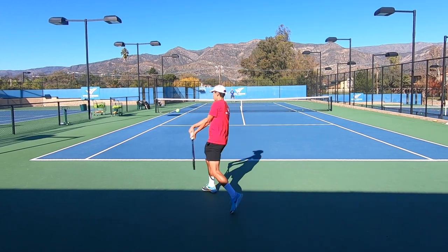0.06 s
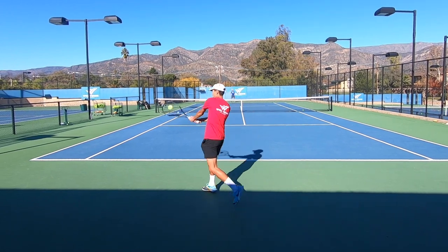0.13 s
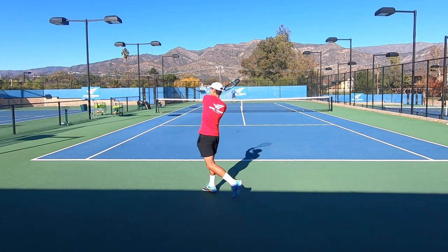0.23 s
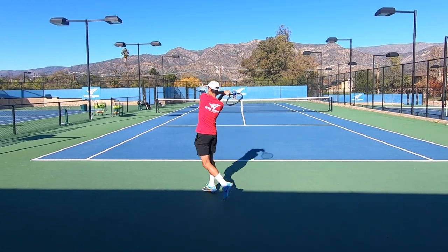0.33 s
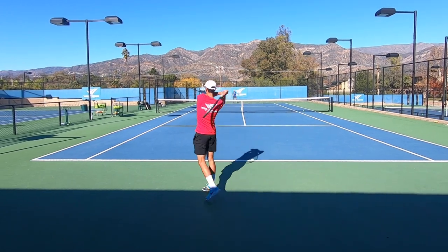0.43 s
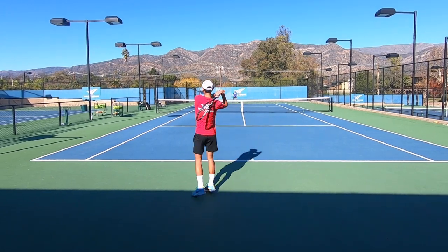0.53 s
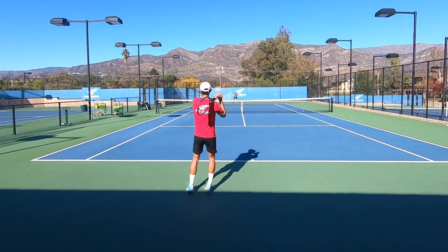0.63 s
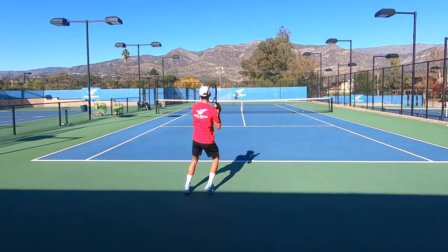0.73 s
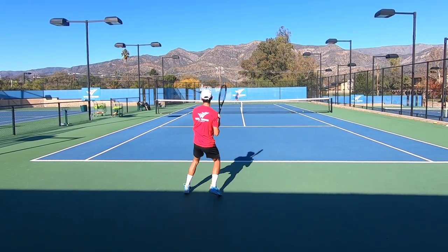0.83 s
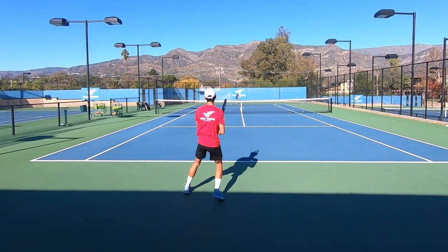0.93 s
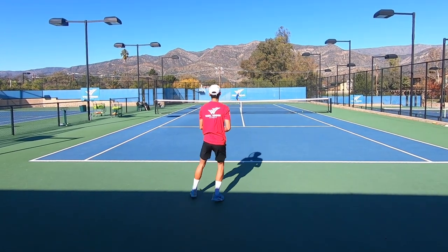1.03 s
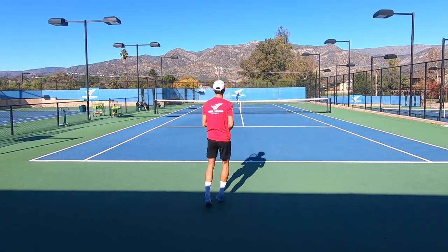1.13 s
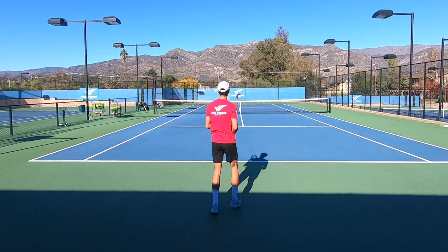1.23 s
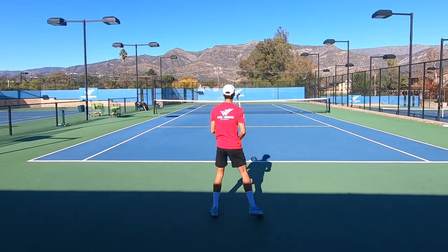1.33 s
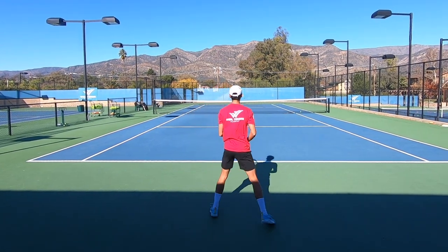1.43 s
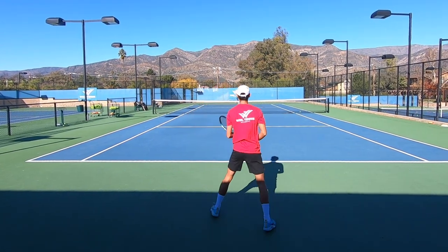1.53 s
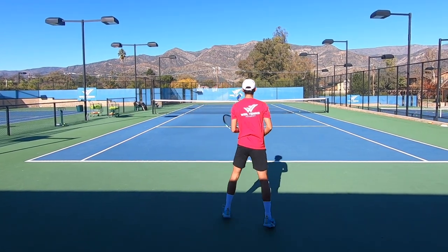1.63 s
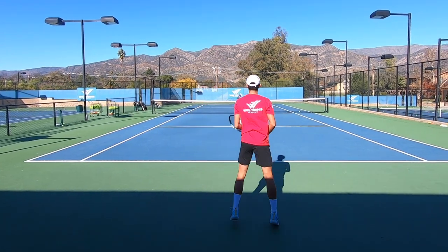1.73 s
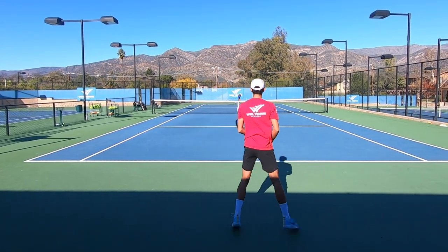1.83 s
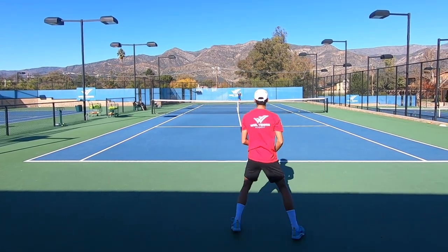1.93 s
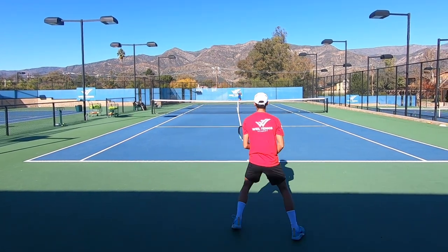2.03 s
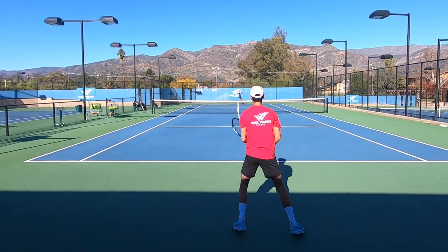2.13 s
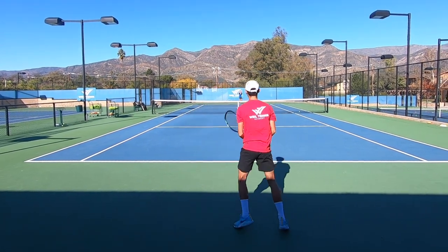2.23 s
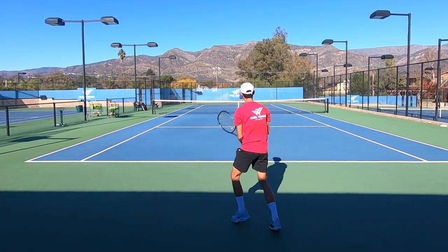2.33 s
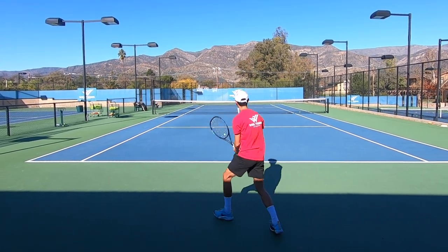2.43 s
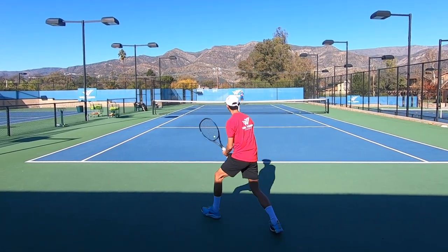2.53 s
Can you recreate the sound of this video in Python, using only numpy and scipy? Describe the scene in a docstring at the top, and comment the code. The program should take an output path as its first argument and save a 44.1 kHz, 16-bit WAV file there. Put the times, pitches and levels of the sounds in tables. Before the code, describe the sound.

Tennis shots on an open hard court, heard from behind the baseline on a phone: light bounce, swish, loud racket pop with echoes, shoe scuffs, then a duller far pop with wall echo and a heavy bounce.

```python
"""An outdoor hard court heard from a phone behind the baseline. A low two-partial hum wavers over noise-made
traffic throughout. A ball thuds, shoes scuff as filtered noise, a racket swishes and whistles, then the near
hit rings its modes with a noise crack; fence echoes and a noise tail follow, a second bounce among them.
Footfalls thud and a faint pop comes from another court; the far racket pops with its own echoes and tail,
and a last, heavier bounce lands between late scuffs and the end."""
import sys
import numpy as np
from scipy import signal
from scipy.fft import rfft, irfft
from scipy.io import wavfile
from scipy.ndimage import uniform_filter1d

SR = 44100
rng = np.random.default_rng(int(sys.argv[2]) if len(sys.argv) > 2 else 0)


def int16_out(signal):
    """Quantize to a 16-bit WAV file."""
    q = np.round(np.clip(np.atleast_2d(signal).T, -1, 1) * 32767)
    wavfile.write(sys.argv[1], SR, q.astype(np.int16))


def volts(x):
    """Linear amplitude factor 10**(x/20) for a level x in dB, scalar or array-like."""
    e = np.asarray(x, float) / 20
    return 10 ** e


N = 114660
T = np.arange(N) / SR
SIDES = np.array([[1], [-1]])  # side signal: plus on the left, minus on the right

# distant traffic spectrum (f/Hz, relative level/dB)
TRAFFIC = [(15, -11.5), (28, -6), (66, -20), (90, -16), (150, -21), (300, -28), (500, -37.5), (1000, -36),
           (2600, -47), (6000, -58.5), (12000, -71)]
# traffic side against mid (f/Hz, level/dB)
TRAFFIC_SIDE = [(20, -18), (60, -4), (250, -16), (600, -4.5), (1500, 0.5), (8000, -4)]
TRAFFIC_DB, TRAFFIC_FLICKER_DB = -47.5, 1
# machine hum swells and dips (t/s, level/dB)
HUM = [(0, -41), (.15, -46), (.4, -52.5), (.65, -47), (1.05, -50), (1.3, -55), (1.45, -44), (1.75, -43),
       (1.95, -48.5), (2.12, -60), (2.28, -42), (2.6, -46.5)]
HUM_HZ, HUM_WAVER, HUM_WAVER_DB, HUM_OCTAVE_DB = 59.86, 0.018, 2.5, -7.5  # HUM_WAVER: fraction of pitch

# modes of a ball or sole thudding on the court (f/Hz, level/dB, t60/s)
THUD_MODES = [(226, -2, 0.043), (361, -3.5, 0.03), (527, 1, 0.012), (806, 3.5, 0.014), (1093, -25.5, 0.084),
              (1470, -3, 0.013)]
# ball bounces (t/s, level/dB, left-right level/dB, crack level/dB)
BOUNCES = [(.0235, -32, -5, -52), (.3725, -27, 4.5, -42.5)]
# the last, heavier bounce (t/s, level/dB, left-right level/dB, crack level/dB)
NEAR_BOUNCE = [(2.5945, -15, -15.5, -66)]
# footfalls (t/s, level/dB, left-right level/dB, crack level/dB)
STEPS = [(.692, -45, -4, -60), (1.0855, -43, -3.5, -45), (1.486, -43, -7, -50)]
# noise crack of every blow (f/Hz, level/dB)
CRACK_COLOUR = [(400, 3.5), (1200, 7.5), (2500, 4), (4500, 1.5), (8000, 0.5), (12000, -3)]
CRACK_T60_S = 0.024  # for an unsmeared blow
PORT_HZ = 452  # below this both ports hear blows and scuffs much the same
DETUNE = 0.0375  # spread of mode pitch in smeared echoes, as a fraction

# shoe scuffs (start t/s, attack t/s, hold t/s, level/dB, left-right level/dB, centre f/Hz)
SCUFFS = [(0.102, 0.027, 0.029, -61.5, -4.5, 4500), (0.581, 0.066, 0.034, -63, -4, 5400),
          (0.6858, 0.0063, 0.045, -45.5, -3, 5030), (0.953, 0.00075, 0.012, -54.5, -5, 5440),
          (1.181, 0.0025, 0.043, -55.5, -4, 5540), (1.213, 0.04, 0.039, -51.5, -5, 6400),
          (1.481, 0.0043, 0.041, -56.5, -5, 6240), (1.169, 0.011, 0.082, -59.5, -6, 610),
          (1.78, 0.0017, 0.0017, -63.5, -4, 7000), (1.794, 0.004, 0.006, -70, -13.5, 7000),
          (2.153, 0.042, 0.11, -70.5, -8, 7000), (2.238, 0.0022, 0.019, -62, -2, 4650),
          (2.264, 0.0044, 0.0022, -56.5, -8, 5900), (2.342, 0.008, 0.009, -59, -8, 7000),
          (2.365, 0.0041, 0.009, -55.5, -5, 4770), (2.427, 0.00082, 0.0025, -69, -12, 7600),
          (2.439, 0.0018, 0.0012, -59.5, -7, 7000)]
SCUFF_OCTAVES, SCUFF_LOW_DB, SCUFF_LOW_HZ = 0.89, -8, 1150
SCUFF_RELEASE_S, SCUFF_TAIL_DB, SCUFF_TAIL_S = 0.0021, -11, 0.043
SCUFF_GRIT_DB, SCUFF_PATCHY_DB, SCUFF_SIDE_DB = 1.8, 3.8, -4.5

# racket swish (t/s, level/dB, string whistle f/Hz)
SWISH = [(.165, -67, 4700), (.185, -53.5, 5180), (.205, -48, 5300), (.222, -43, 5600), (.235, -36.5, 5600),
         (.26, -61, 5200), (.33, -52.5, 4800), (.36, -70, 4600)]
# air rush of the swish (f/Hz, level/dB)
SWISH_COLOUR = [(200, -12.5), (600, -2), (2000, -9), (5000, -11), (9000, -15), (14000, -9)]
WHISTLE_DB, WHISTLE_ENDS_S = -10, 0.226
WHISTLE_UPPER, WHISTLE_UPPER_DB = 1.6, -6  # upper partial: pitch ratio and level

# modes of ball and strings, close hit (f/Hz, level/dB, t60/s)
NEAR_MODES = [(95, -18, 0.079), (191, -8.5, 0.031), (287, -3.5, 0.042), (391, -6, 0.035), (543, -3, 0.023),
               (749, -1.5, 0.03), (974, -13.5, 0.043), (1006, -21.5, 0.077), (1079, 0.5, 0.025),
              (1302, -17.5, 0.043), (1488, -20, 0.073), (1660, -23, 0.043), (2027, -19, 0.036),
              (2475, -16.5, 0.019), (3210, -23.5, 0.03)]
# the close hit (t/s, level/dB, left-right level/dB, crack level/dB)
NEAR_HIT = [(.2258, -3, -2, -14.5)]
# its echoes off fences and walls (t/s, level/dB, left-right level/dB, crack level/dB)
NEAR_ECHOES = [(.413, -37, -13, -57), (.4235, -25.5, 7, -48), (.439, -33.5, 2, -49)]
CONTACT_S, ECHO_SMEAR_S = 0.0027, 0.002973
FENCE_HZ = 1000  # fences return little below this

# scattered echo tail of each hit (start t/s, level/dB, rise t/s, t60/s, broad part level/dB)
TAILS = [(0.23, -47, 0.0103, 1.14, 4), (1.86, -41.5, 0.0059, 1.68, -6.5)]
# the ball's ring in the tail (f/Hz, level/dB)
TAIL_COLOUR = [(550, -12), (850, 17), (1130, 23), (1400, -7), (1800, -21.5)]
# broader wash in the tail (f/Hz, level/dB)
TAIL_BROAD = [(300, 2), (700, 1), (1600, 0.5), (2500, -11), (4000, -9), (7000, -22)]
TAIL_FLUTTER_DB, TAIL_SIDE_DB = 1.5, -4
AIR_HZ, AIR_T60_S = 3500, 0.54  # added decay: the air eats the wash's treble sooner
LAST_WALL_S, BEYOND_T60_S = 0.33, 5.9  # added decay once the farthest wall has answered

# modes of ball and strings, far hit (f/Hz, level/dB, t60/s)
FAR_MODES = [(218, -9, 0.02), (380, -10, 0.011), (562, -13, 0.025), (812, -13, 0.066), (1110, 1, 0.021),
             (1241, -5.5, 0.016), (1737, -18, 0.015), (2250, -21, 0.0095), (3120, -18.5, 0.016)]
# a faint pop from another court (t/s, level/dB, left-right level/dB, crack level/dB)
OTHER_POP = [(1.165, -41.5, -6, -65)]
# the far hit (t/s, level/dB, left-right level/dB, crack level/dB)
FAR_HIT = [(1.8565, -35, 4, -47), (1.8585, -9, -2, -32), (1.8642, -16, -13.5, -56)]
# its echoes (t/s, level/dB, left-right level/dB, crack level/dB)
FAR_ECHOES = [(1.873, -23.5, -4, -36), (1.882, -24.5, -13.5, -40.5), (1.894, -24, 2, -45),
              (1.902, -24.5, -7, -37), (1.952, -64, -10, -34.5), (2.003, -38, -20, -65)]
# a flat wall returns both knocks cleanly (t/s, level/dB, left-right level/dB, crack level/dB)
WALL_ECHO = [(1.9572, -17, 11.5, -36.5), (1.961, -22.5, 1, -44)]

# treble colour of the phone's ports (f/Hz, level/dB)
MIC = [(2500, 1), (4700, -3), (6000, -3), (7500, -6), (10000, -9), (12000, -18.5), (15000, -19.5),
       (17000, -27)]


def colour(x, points):
    """Filter by (f/Hz, level/dB) points on a log frequency axis."""
    p, n = np.array(points, float), x.shape[-1]
    f = np.maximum(np.arange(n // 2 + 1) * SR / n, 1)
    gain_db = np.interp(np.log(f), np.log(p[:, 0]), p[:, 1])
    return irfft(rfft(x) * volts(gain_db), n)


def unit(x):
    """Scale to rms 1."""
    return x / np.sqrt(np.mean(x ** 2))


def walk(rate):
    """Slow random wander, spread 1, from about `rate` fresh values a second."""
    k = int(SR / rate)
    steps = np.repeat(rng.standard_normal(N // k + 1), k)
    w = uniform_filter1d(uniform_filter1d(steps, k), k)[:N]
    return unit(w - w.mean())


def wide(points, side_db):
    """Stereo noise of one colour: shared mid plus unrelated side."""
    mid, side = (unit(colour(rng.standard_normal(N), points)) for _ in range(2))
    return mid + volts(side_db) * side * SIDES


def place(x, pan_db):
    """Pan the part above the port frequency."""
    low = signal.lfilter(*signal.butter(1, PORT_HZ, fs=SR), x)
    return low + (x - low) * volts(pan_db / 2 * SIDES)


def traffic():
    """Smooth distant rumble, its stereo width changing with pitch."""
    mid, side = (colour(rng.standard_normal(N), TRAFFIC) for _ in range(2))
    both = mid + colour(side, TRAFFIC_SIDE) * SIDES
    return unit(both) * volts(TRAFFIC_DB + TRAFFIC_FLICKER_DB * walk(4.295))


def hum():
    """A wavering low tone and a partial near its octave."""
    s, db = np.array(HUM, float).T
    phase = 2 * np.pi * np.cumsum(HUM_HZ * (1 + HUM_WAVER * walk(7))) / SR
    first = volts(0.63 * HUM_WAVER_DB * walk(16.23)) * np.sin(phase)
    second_level = volts(HUM_OCTAVE_DB + HUM_WAVER_DB * walk(8.09))
    second = second_level * np.sin(1.98 * phase + 1.1 * walk(6.4))
    return np.sqrt(2) * volts(np.interp(T, s, db)) * (first + second)


def ring_modes(modes, u, top_hz, detune, rise_s):
    """Struck body: decaying sines of alternating sign, dulled above top_hz, softened by contact time."""
    ring = np.zeros(len(u))
    off = rng.standard_normal(len(modes))
    for k, (hz, db, t60) in enumerate(modes):
        tone = np.sin(2 * np.pi * hz * (1 + detune * off[k]) * u)
        dulling = 1 + (hz / top_hz) ** 2
        ring += (-1) ** k * volts(db) * tone * volts(-60 * u / t60) / dulling
    return ring * (1 - np.exp(-u / rise_s)) ** 2


def cluster(ring, smear_s):
    """A rough surface returns one arrival as four, at random small delays."""
    copies = ring.copy()
    for k, lag in enumerate(rng.random(3)):
        copies += 0.62 * np.roll(ring, int((k + lag) * smear_s * SR))
    return 0.96 * copies


def crack(u, top_hz, pan_db, smear_s, rise_s):
    """Short stereo noise burst of a contact, dulled by its path and lengthened by smear."""
    noise = unit(colour(rng.standard_normal((2, len(u))), CRACK_COLOUR))
    mid, side = signal.lfilter(*signal.butter(2, top_hz, fs=SR), noise)
    env = volts(-60 * u / (CRACK_T60_S + 3 * smear_s)) * (1 - np.exp(-3 * u / rise_s))
    return (place(mid, pan_db) + 0.71 * side * SIDES) * env


def blows(rows, modes, top_hz, smear_s=0, rise_s=0.0001):
    """Every arrival rings the modes with a short noise crack; smeared ones come as a small detuned cluster."""
    out, t = np.zeros((2, N)), np.arange(4096) / SR
    for s, db, pan_db, crack_db in rows:
        u = np.maximum(t - (s * SR % 1) / SR, 0)  # keeps the onset between samples
        ring = ring_modes(modes, u, top_hz, DETUNE if smear_s else 0, rise_s)
        if smear_s:
            ring = cluster(ring, smear_s)
        hiss = crack(u, top_hz, pan_db, smear_s, rise_s)
        y = volts(db) * place(ring, pan_db) + volts(crack_db) * hiss
        i = int(s * SR)
        out[:, i:i + len(t)] += y[:, :N - i]
    return out


def bounces():
    """The ball thuds on the court; the last, heavier bounce is duller and slower to rise."""
    light = blows(BOUNCES, THUD_MODES, top_hz=4500, rise_s=0.00084)
    return light + blows(NEAR_BOUNCE, THUD_MODES, top_hz=536, rise_s=0.003)


def scuffs():
    """Rubber drags over gritty paint: grainy hiss in bands that flare alone, a duller rub, a short tail."""
    out = np.zeros((2, N))
    for s, attack, hold, db, pan_db, hz in SCUFFS:
        i = int(s * SR)
        u = np.arange(min(12288, N - i)) / SR
        n = len(u)
        after = np.maximum(u - attack - hold, 0)
        fade = np.exp(-after / SCUFF_RELEASE_S) + volts(SCUFF_TAIL_DB) * np.exp(-after / SCUFF_TAIL_S)
        env = np.clip(u / attack, 0, 1) ** 2 * fade
        f = np.maximum(np.fft.rfftfreq(n, 1 / SR), 1)
        hiss_shape = np.exp(-.5 * (np.log2(f / hz) / SCUFF_OCTAVES) ** 2)
        rub_shape = np.exp(-.5 * np.log2(f / SCUFF_LOW_HZ) ** 2)
        shape = hiss_shape + volts(SCUFF_LOW_DB) * rub_shape
        grains = np.repeat(rng.standard_normal(n // 64 + 1), 64)[:n]
        grit = rfft(rng.standard_normal((2, n)) * volts(SCUFF_GRIT_DB * grains)) * shape
        # overlapping triangular bands, five to the octave from 250 Hz
        bands = np.maximum(1 - abs(5 * np.log2(f / 250) - np.arange(31)[:, None]), 0)
        flare_steps = np.repeat(rng.standard_normal((31, 24)), 600, axis=1)
        flares = uniform_filter1d(flare_steps, 500)[:, :n]
        patchy = sum(irfft(grit * band, n) * volts(SCUFF_PATCHY_DB * flare)
                     for band, flare in zip(bands, flares))
        mid, side = unit(patchy)
        rubbed = place(mid, pan_db) + volts(SCUFF_SIDE_DB) * side * SIDES
        out[:, i:i + n] += volts(db) * env * rubbed
    return out


def swish():
    """Air rushes past the racket; the strings whistle until contact."""
    s, db, hz = np.array(SWISH, float).T
    phase = 2 * np.pi * np.cumsum(np.interp(T, s, hz) * (1 + 0.0216 * walk(230))) / SR
    tones = np.sin(phase) + volts(WHISTLE_UPPER_DB) * np.sin(WHISTLE_UPPER * phase)
    whistle = tones * volts(WHISTLE_DB + 3.7 * walk(150)) * (T < WHISTLE_ENDS_S)
    return volts(np.interp(T, s, db, -120, -120)) * (wide(SWISH_COLOUR, -1.8) + whistle)


def near_hit():
    """The near racket rings close by; fences and walls return it thin and smeared."""
    direct = blows(NEAR_HIT, NEAR_MODES, top_hz=14600, rise_s=CONTACT_S)
    echoes = blows(NEAR_ECHOES, NEAR_MODES, top_hz=4500, smear_s=ECHO_SMEAR_S)
    return direct + signal.lfilter(*signal.butter(1, FENCE_HZ, "high", fs=SR), echoes)


def tails():
    """Dense fluttering echoes from fences and far buildings: the ball's ring over a broader wash."""
    ring, wash = wide(TAIL_COLOUR, TAIL_SIDE_DB), wide(TAIL_BROAD, TAIL_SIDE_DB)
    dull = signal.lfilter(*signal.butter(2, AIR_HZ, fs=SR), wash)
    out = np.zeros((2, N))
    for s, db, rise, t60, broad_db in TAILS:
        age = np.maximum(T - s, 0)
        beyond = np.maximum(T - s - LAST_WALL_S, 0)
        env = np.clip((T - s) / rise, 0, 1) * volts(-60 * age / t60 - 60 * beyond / BEYOND_T60_S)
        aired = dull + (wash - dull) * volts(-60 * age / AIR_T60_S)
        out += volts(db) * env * (ring + volts(broad_db) * aired)
    return volts(TAIL_FLUTTER_DB * walk(100)) * out


def footfalls():
    """Soles land on the court and ring the thud modes with a quick onset."""
    return blows(STEPS, THUD_MODES, top_hz=7000)


def far_pops():
    """Distance dulls the other court's pop, the far hit and its clean wall echo; other echoes are smeared."""
    clean = blows(OTHER_POP + FAR_HIT + WALL_ECHO, FAR_MODES, top_hz=3300, rise_s=0.00056)
    return clean + blows(FAR_ECHOES, FAR_MODES, top_hz=3410, smear_s=0.0022)


def scene():
    """All sources summed."""
    background = traffic() + hum()
    player = scuffs() + swish() + near_hit() + footfalls()
    return background + bounces() + player + tails() + far_pops()


def low_pass(x):
    """Removes everything above the highest recorded frequency."""
    return signal.sosfilt(signal.butter(12, 16150, fs=SR, output="sos"), x)


def record(dry):
    """The phone's ports colour the treble."""
    mix = colour(dry, MIC)
    return low_pass(mix)


dry = scene()
out = record(dry)
int16_out(out)
```